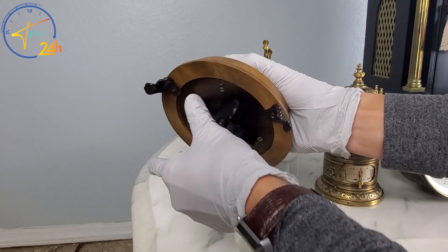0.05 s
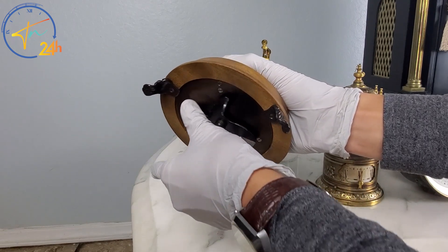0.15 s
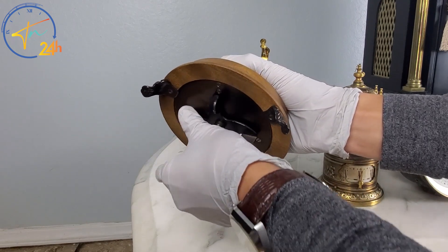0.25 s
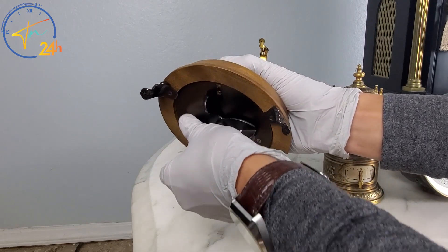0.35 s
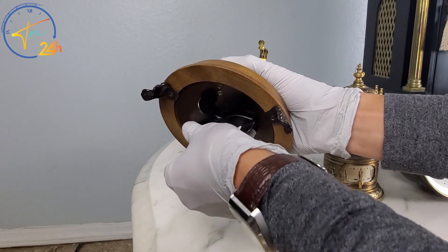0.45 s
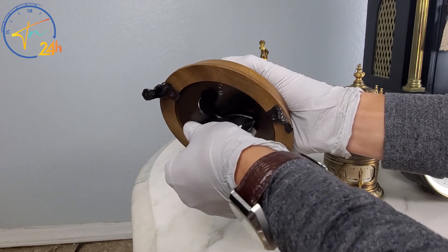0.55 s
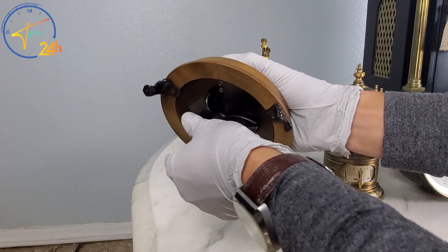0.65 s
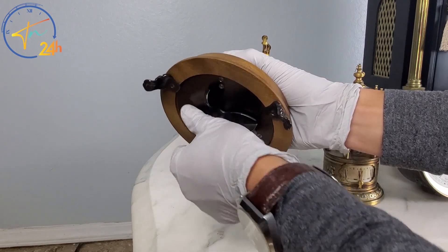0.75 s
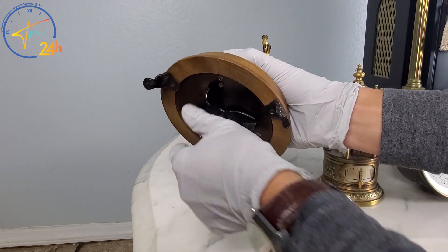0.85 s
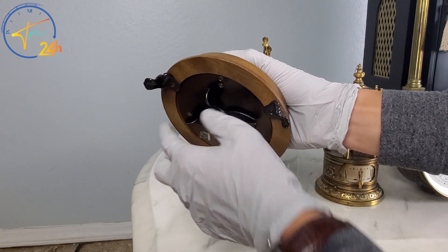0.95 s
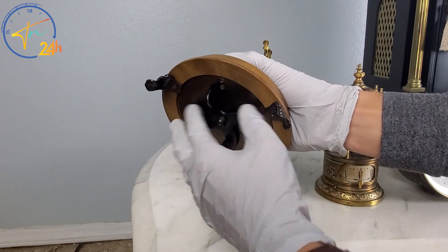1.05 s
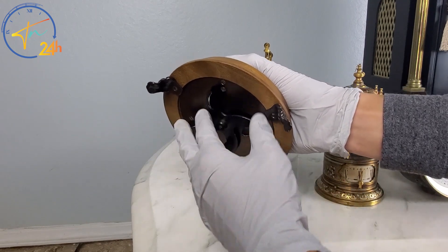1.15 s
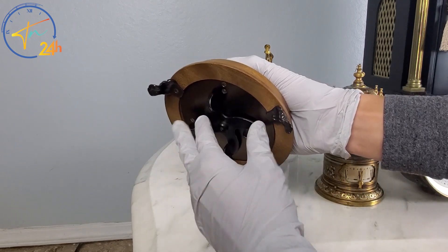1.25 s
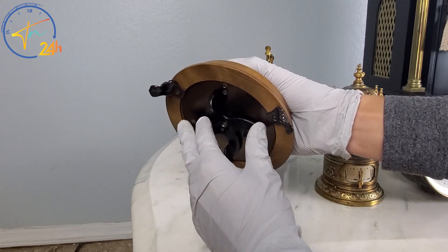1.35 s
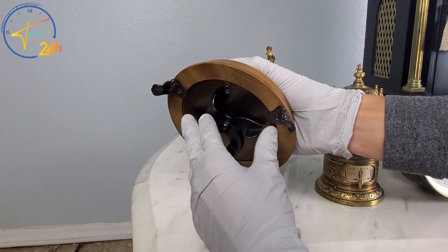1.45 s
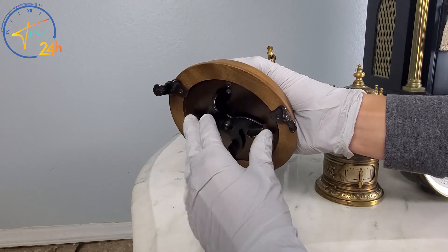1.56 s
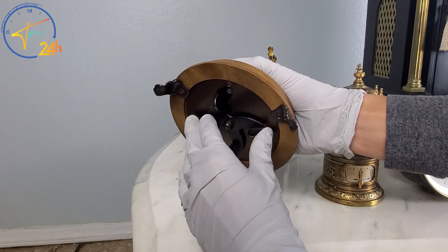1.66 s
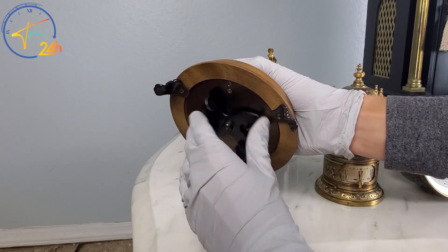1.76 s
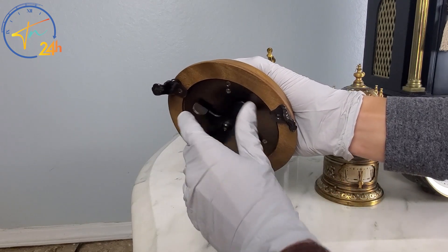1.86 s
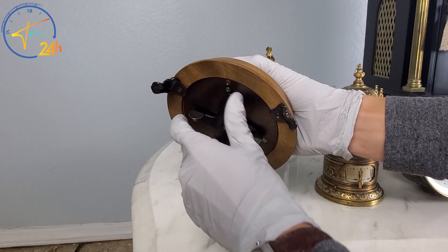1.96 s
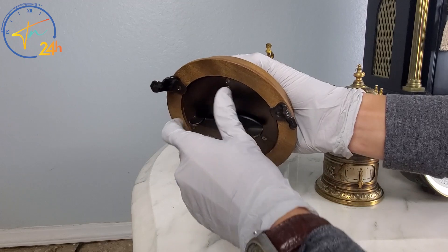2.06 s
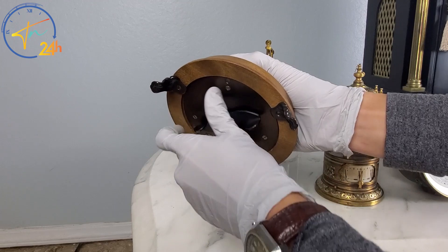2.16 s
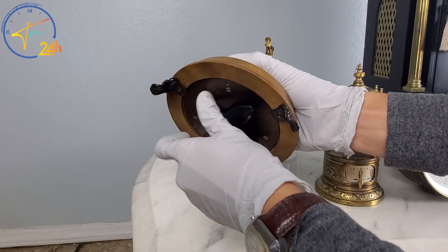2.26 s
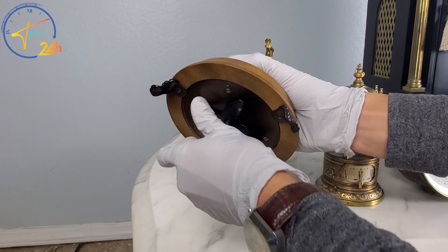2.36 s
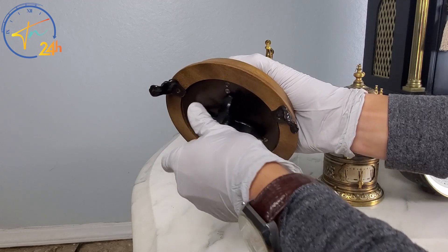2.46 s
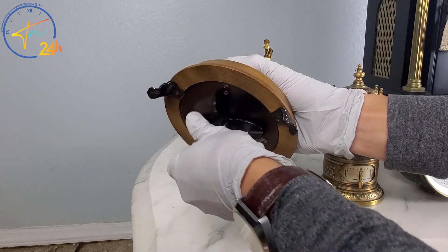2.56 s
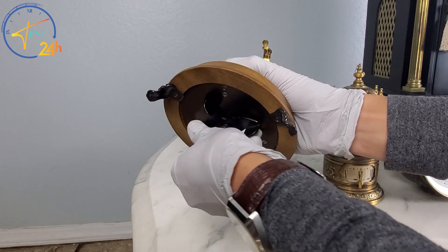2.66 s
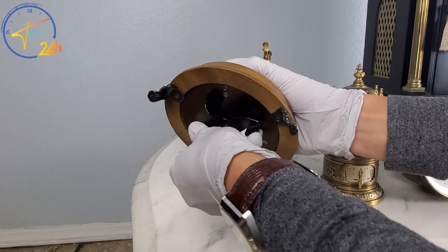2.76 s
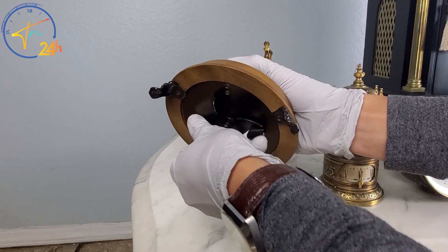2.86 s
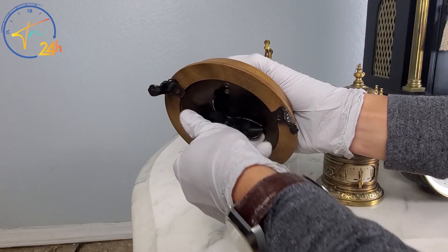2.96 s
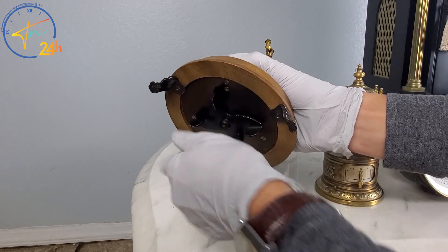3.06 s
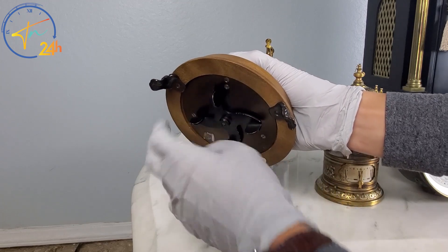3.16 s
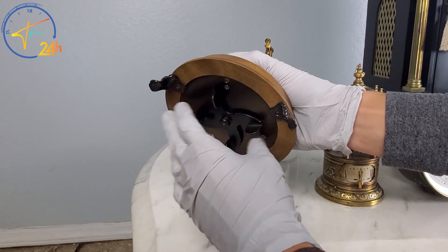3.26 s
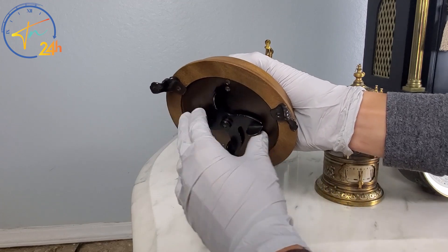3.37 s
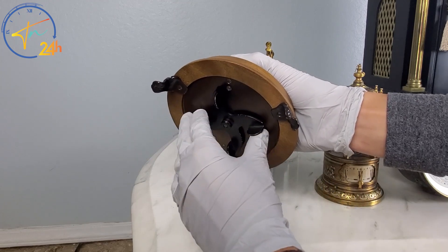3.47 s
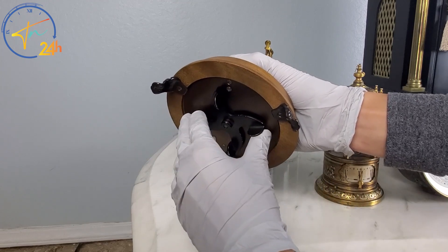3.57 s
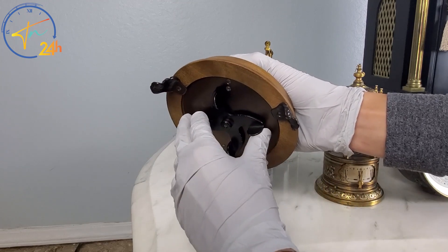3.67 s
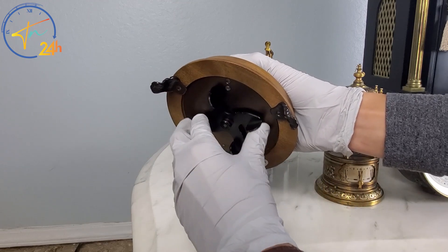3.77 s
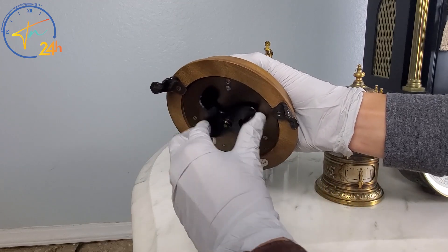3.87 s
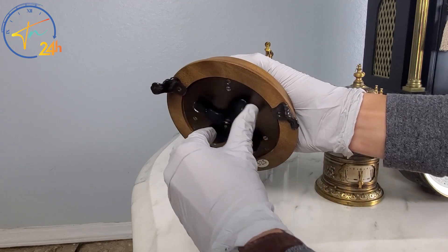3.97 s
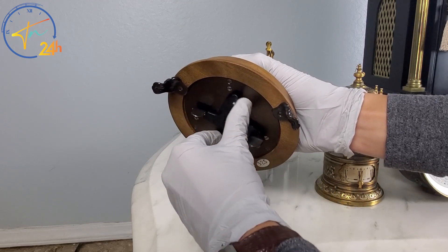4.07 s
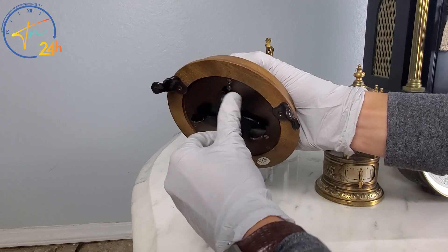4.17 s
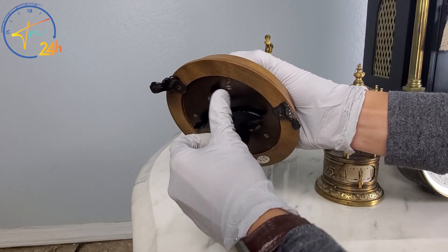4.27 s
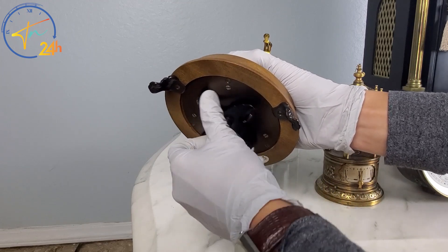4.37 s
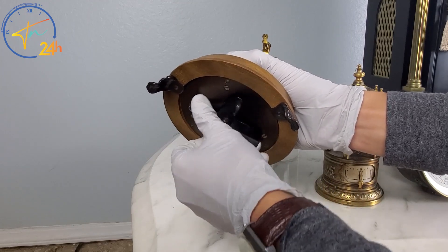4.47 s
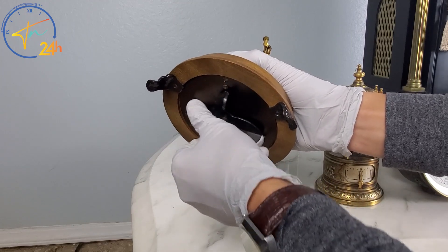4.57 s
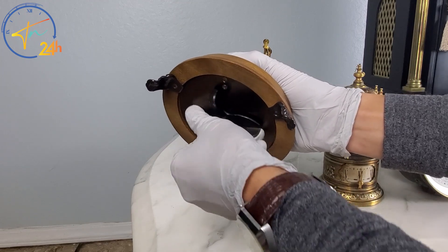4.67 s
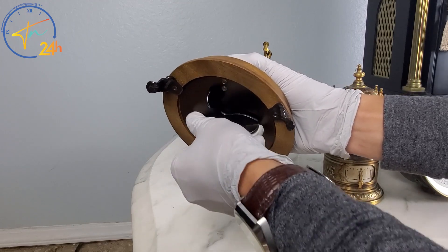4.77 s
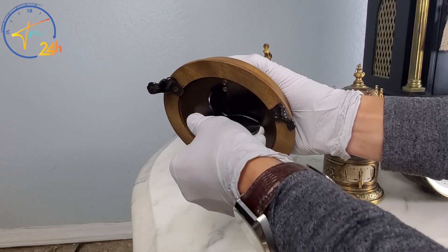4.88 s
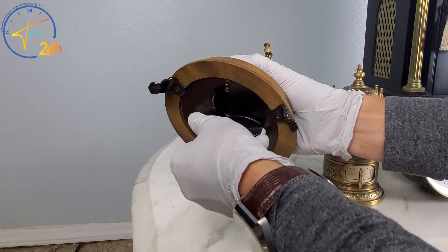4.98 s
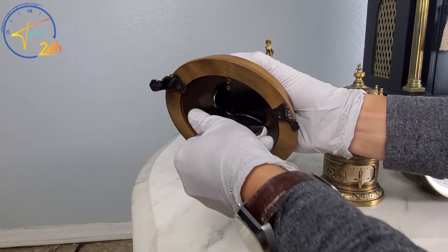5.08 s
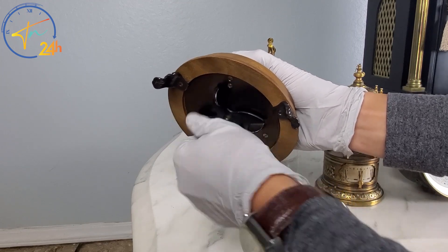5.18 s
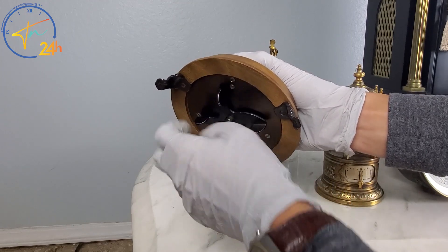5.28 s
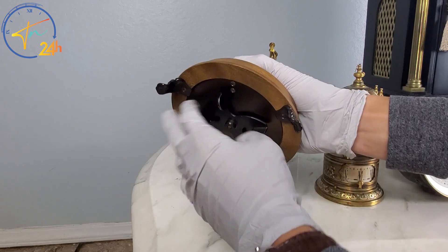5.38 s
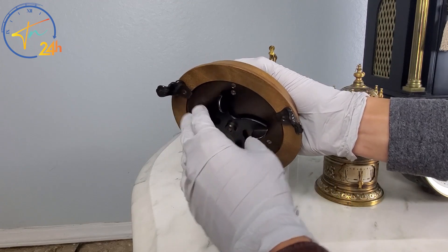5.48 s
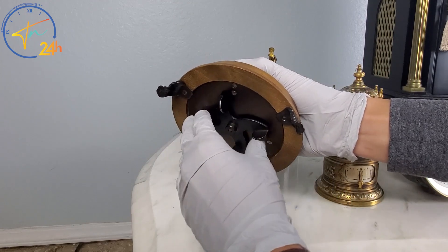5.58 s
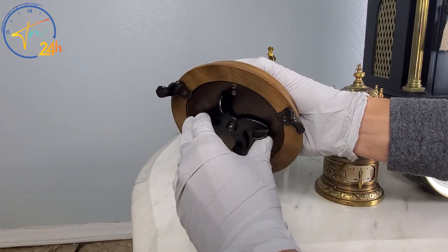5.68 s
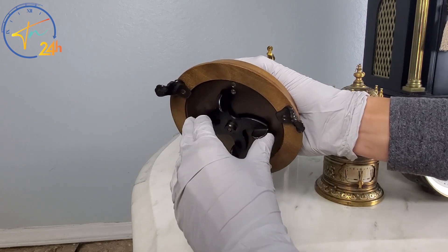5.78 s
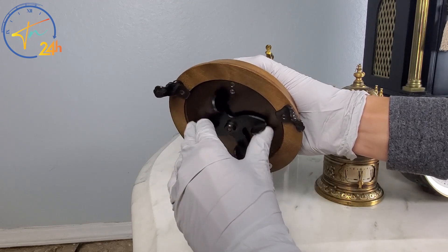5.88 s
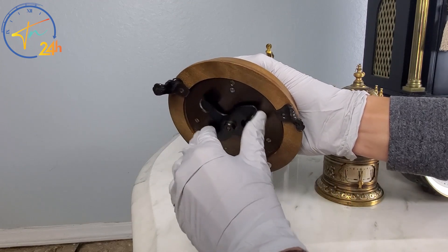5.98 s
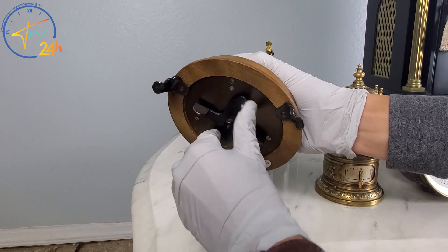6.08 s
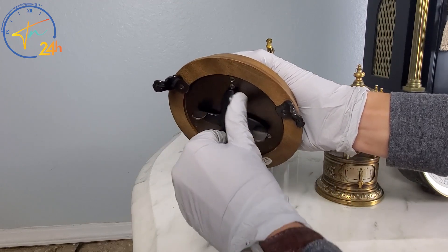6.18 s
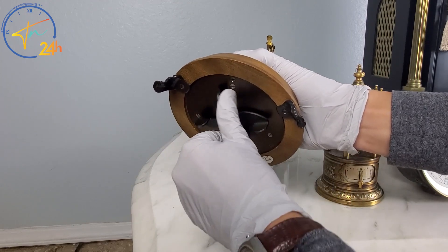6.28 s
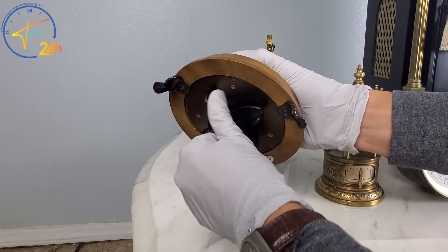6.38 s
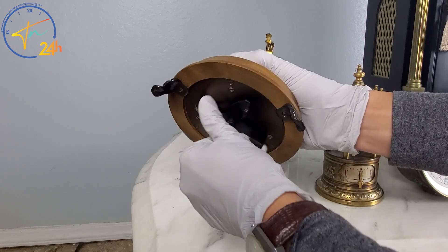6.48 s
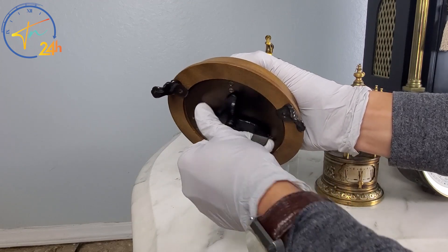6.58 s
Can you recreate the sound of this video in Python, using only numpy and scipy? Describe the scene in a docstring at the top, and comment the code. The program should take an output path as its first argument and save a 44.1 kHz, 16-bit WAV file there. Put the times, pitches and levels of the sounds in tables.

```python
"""Winding a small clock

A small quiet room with a distant fan. Close to a stereo pair, a gloved hand winds a wood-cased clock.
In each half turn the key knocks home on its arbor and the pawl snaps over the ratchet teeth, setting
its spring and the movement ringing; as the hand lets go, the wheel falls back against the pawl.
The glove brushes the key, and the case bumps in the holding hand."""
import sys
import numpy as np
from scipy import signal
from scipy.fft import rfft, irfft
from scipy.io import wavfile
from scipy.ndimage import uniform_filter1d

SR = 44100
rng = np.random.default_rng(int(sys.argv[2]) if len(sys.argv) > 2 else 0)


def master(y):
    """Save y as 16-bit WAV."""
    cut = np.clip(np.atleast_2d(y).T, -1, 1)
    pcm = np.round(cut * 32767)  # scale
    wavfile.write(sys.argv[1], SR, pcm.astype(np.int16))


N = 292383
TIME = np.arange(N) / SR
BLOW = round(.01 * SR)   # samples in a 10 ms contact

# Table levels are relative. Spectrum of the room's air: f/Hz, level/dB
AIR_SPECTRUM = [(25, -14.5), (60, 0.5), (72, -1), (85, 4), (130, -14), (380, -14.5), (480, -24.5),
                (1000, -32.5), (1900, -35), (2300, -33), (3500, -39), (7900, -44.5), (9300, -50.5),
                (15000, -40)]
# its stereo width: f/Hz, side minus mid/dB
AIR_WIDTH = [(60, -28), (110, -12), (200, -8), (380, 5), (700, 4), (1290, 7), (2380, -1.5), (4400, 3.5),
             (8120, 0), (15000, 0)]
# its lean across the pair: f/Hz, left minus right/dB
AIR_LEAN = [(60, -1.5), (700, 0.5), (2400, -3.5), (15000, -4)]

# resonances of each part: f/Hz, width/Hz, level/dB
FAN_MODES = [(296, 3, 0), (240, 8, -11), (356, 8, -8)]
CASE_MODES = [(504, 44, -4), (783, 45, 3), (1065, 60, -3), (1250, 43, 1), (1400, 660, -7),
              (2325, 550, -5.5)]
HOLLOW_BACK_MODES = [(1760, 130, -3), (2270, 200, -2), (2480, 150, -2), (3010, 120, -5)]
GLOVE_MODES = [(5600, 3300, -7), (8100, 1800, -2.5), (11100, 1900, -2), (15700, 6500, -5)]
KEY_MODES = [(4410, 200, -4.5), (5200, 70, 4.5), (6080, 97, 2.5), (6640, 300, -3), (7750, 700, -7.5),
             (8550, 300, -1), (11800, 13000, -10.5)]
BACK_PLATE_MODES = [(1120, 820, -6.5), (1407, 44, 16.5)]
MOVEMENT_MODES = [(1532, 210, -9), (2054, 93, 3.5), (2231, 39, 7.5), (2226, 39, 5), (2448, 210, -1.5),
                  (2770, 140, -9.5), (3006, 70, 3.5), (3136, 300, -1.5), (3770, 580, -8.5)]
TOOTH_MODES = [(3800, 810, -10), (6180, 7800, -7.5), (8470, 2000, -7.5), (10620, 4100, -8),
               (14500, 4100, 2.5)]
PAWL_SPRING_MODES = [(5030, 227, -1.5), (5320, 71, -9.5), (5350, 95, -7), (5715, 188, -2.5),
                     (5868, 300, -6.5)]
PAWL_TIP_MODES = [(11820, 470, -6.5), (14900, 3800, 4)]
# resonances of the coiled mainspring: multiple of its ring, width/Hz, level/dB
COIL_MODES = [(0.998, 44.7, 5), (1.37, 27.3, -3)]

# half turns of the key: start/s, end/s, strongest pawl spring ring/dB, movement ring/dB
HALF_TURNS = [(-0.7, 0.57, -42.5, -53.5), (1.69, 2.76, -40, -51), (3.74, 4.88, -40.5, -51.5),
              (5.85, 7.0, -39, -53.5)]
# glove slipping over the key: middle t/s, length/s, level/dB
GLOVE_SLIPS = [(0.645, 0.017, -51.5), (1.728, 0.062, -55), (2.812, 0.0082, -50), (1.351, 0.012, -72.5),
               (3.146, 0.042, -78), (3.367, 0.036, -75), (4.912, 0.0098, -54), (5.243, 0.029, -53.5)]
# case bumping in the holding hand: t/s, level/dB
CASE_BUMPS = [(0.0085, -54.5), (0.140, -51), (0.149, -64), (0.159, -58), (0.643, -56.5), (2.1572, -47.5),
              (2.184, -44), (2.194, -44), (2.294, -60), (2.81, -56), (6.225, -60)]
# key taking or giving back the load: t/s, movement/dB, metal edge/dB, back plate/dB, coil ring f/Hz
KEY_KNOCKS = [(0.0954, -59.5, -85, -65, 2520), (0.5674, -43, -54, -74, 2040),
              (1.692, -40.5, -43, -52.5, 2297), (2.183, -50.5, -41, -63, 2220),
              (2.759, -43.5, -51, -60, 1957), (3.701, -62.5, -78, -80, 2200),
              (3.738, -42, -49.5, -50.5, 2030), (4.882, -42.5, -57.5, -58, 2122),
              (5.855, -40.5, -45.5, -53, 2250)]
# pawl dropping off a tooth: t/s, level/dB, left minus right/dB
PAWL_DROPS = [(0.0151, -38, -10), (0.1403, -40, -9), (0.2766, -44, -7), (0.387, -36, -10),
              (1.7723, -35, -11), (1.8391, -29, 10), (1.9194, -32, -10), (2.0111, -39, -2),
              (2.1088, -32, -9), (2.2036, -33, -12), (2.2949, -31, -6), (2.4133, -33, -8), (2.51, -36, -6),
              (2.6011, -27, -14), (3.869, -35, -6), (3.9534, -36, -7), (4.0729, -35, -9), (4.1736, -38, -3),
              (4.2623, -34, -10), (4.3503, -38, -5), (4.427, -38, -3), (4.5242, -27, -14),
              (4.6343, -43, -2), (4.7849, -43, -6), (5.9419, -41, -4), (6.0286, -35, -9),
              (6.1198, -32, -11), (6.2128, -35, -6), (6.3002, -34, -7), (6.3864, -33, -11),
              (6.4645, -35, -8), (6.5513, -34, -7)]


def from_db(db):
    return 10 ** (np.asarray(db) / 20)


def unit_energy(x):
    return x / np.sqrt(np.sum(x ** 2, axis=-1, keepdims=True) + 1e-20)


def pan(db):
    """Left and right gains for a level difference."""
    return from_db([[db / 2], [-db / 2]])


def at_hz(points, hz):
    """A curve's value at hz, on a log frequency axis."""
    point_hz, values = np.array(points).T
    return np.interp(np.log(hz + 1), np.log(point_hz), values)


def add(track, s, sound):
    """Mix a stereo sound in at time s."""
    start = max(round(s * SR), 0)
    track[:, start:start + sound.shape[1]] += sound[:, :max(N - start, 0)]


def swell(s, length):
    """Smooth rise and fall around time s."""
    return np.exp(-(2 * (TIME - s) / length) ** 2)


def resonate(x, modes, size=16384):
    """Parallel resonances of alternating sign; white input keeps its power."""
    response = 0
    for k, (hz, width, db) in enumerate(modes):
        r = np.exp(-np.pi * width / SR)
        poles = [1, -2 * r * np.cos(2 * np.pi * hz / SR), r * r]
        ring = signal.lfilter([1, 0, -1], poles, signal.unit_impulse(size))
        response = response + (-1) ** k * from_db(db) * (1 - r * r) * ring
    return signal.fftconvolve(x, unit_energy(response)[None], axes=1)[:, :N]


def chatter(t60, rise, rough_db, size=8192):
    """Dying train of tiny uneven contacts, different at each microphone; rms 1 if spread over 10 ms."""
    t = np.arange(size) / SR
    uneven = uniform_filter1d(rng.standard_normal(size), size=36) * np.sqrt(36)
    envelope = from_db(-60 * t / t60 + rough_db * uneven) * (1 - np.exp(-t / rise))
    return np.sqrt(BLOW) * unit_energy(envelope * rng.standard_normal((2, size)))


def snap(lag, size=8192):
    """One sharp impact, lag samples later at the right microphone; as strong as one chatter."""
    n = np.arange(size) - 8
    return np.sqrt(BLOW) * unit_energy(np.sinc(n - np.array([[-lag / 2], [lag / 2]])))


def room_tone(air_db=-57, fan_db=-74.5):
    """Steady rumble in the middle of the pair, under diffuse hiss and a distant fan's wavering hum."""
    hz = np.arange(N // 2 + 1) * SR / N
    mid, side = rfft(rng.standard_normal((2, N))) * from_db(at_hz(AIR_SPECTRUM, hz))
    side = side * from_db(at_hz(AIR_WIDTH, hz))
    lean = from_db(at_hz(AIR_LEAN, hz) / 2)
    air = irfft(np.array([(mid + side) * lean, (mid - side) / lean]), N)
    fan = resonate(rng.standard_normal((1, N)), FAN_MODES)
    return from_db(air_db) * air / air.std() + from_db(fan_db) * fan


def room(x, t60=0.4, early_db=-6.0, early_t60=0.091, gap_s=.007, echoes_per_s=1500, size=32768):
    """Reflections from table and wall, then a smooth tail."""
    t = np.arange(size) / SR
    late = unit_energy(rng.standard_normal((2, size)) * from_db(-60 * t / t60) * (t > gap_s))
    echoes = rng.standard_normal((2, size)) * (rng.random((2, size)) < echoes_per_s / SR)
    early = unit_energy(echoes * from_db(-60 * t / early_t60) * (t > gap_s))
    return signal.fftconvolve(x, late + from_db(early_db) * early, axes=1)[:, :N]


def reach(db=-79.5, before_s=0.37):
    """The glove brushes the hollow back of the case as the hand reaches for the key again."""
    level = from_db(db) * sum(swell(start - before_s, length=0.55) for start, *_ in HALF_TURNS)
    return resonate(level * rng.standard_normal((2, N)), HOLLOW_BACK_MODES) * pan(-2.2)


def glove(grain_db=3.0, crinkles_per_s=6.3, release_after_s=0.34):
    """Grainy friction and tiny crinkles, mid-turn and as the hand opens; a swish at each slip."""
    progress = [np.clip((TIME - start) / (end - start), 0, 1) for start, end, *_ in HALF_TURNS]
    turning = from_db(-70) * sum(np.sin(np.pi * part) ** 2 for part in progress)
    release = from_db(-71.5) * sum(swell(turn[1] + release_after_s, length=0.45) for turn in HALF_TURNS)
    slip = sum(from_db(db + 0.5) * swell(s, length) for s, length, db in GLOVE_SLIPS)
    grain_samples = np.arange(0, N, 64)
    grains = np.interp(np.arange(N), grain_samples, rng.standard_normal(len(grain_samples)))
    friction = from_db(grain_db * grains) * rng.standard_normal((2, N))
    crinkles = from_db(18) * (rng.random(N) < crinkles_per_s / SR) * rng.normal(0, 2.9, (2, N))
    rustle = slip * friction + (turning + release) * (friction + crinkles)
    # rubbing on the key also stirs the movement
    rub = (from_db(-9.5) * turning + from_db(-13) * release) * friction
    return resonate(rustle, GLOVE_MODES) * pan(-4.5) + resonate(rub, MOVEMENT_MODES)


def case_bumps():
    """Soft, dull blows of the holding hand on the wooden case."""
    force = np.zeros((2, N))
    for s, db in CASE_BUMPS:
        add(force, s, from_db(db) * chatter(t60=.04, rise=.0008, rough_db=3))
    return resonate(force, CASE_MODES) * pan(-2.6)


def key_knocks(slide_db=-14.0, touch_db=-6.0, seat_db=0.5, seat_s=.0024):
    """The key slides, touches and seats; the movement shakes, the coil rings at its tension's pitch."""
    movement, key, plate, coil = np.zeros((4, 2, N))
    for s, movement_db, edge_db, plate_db, coil_hz in KEY_KNOCKS:
        for at, db in ((s - .007, slide_db), (s - .0012, touch_db), (s + seat_s, seat_db)):
            add(movement, at, from_db(movement_db + db) * chatter(t60=0.017, rise=0.00087, rough_db=7))
            add(key, at, from_db(edge_db + db) * chatter(t60=0.02, rise=0.00078, rough_db=-5.5))
            add(plate, at, from_db(plate_db + db) * chatter(t60=0.018, rise=0.00014, rough_db=5.5))
        jolt = from_db(movement_db - 2.5) * snap(lag=rng.normal(0, 9.8))
        modes = [(coil_hz * multiple, width, db) for multiple, width, db in COIL_MODES]
        add(coil, s + seat_s, resonate(jolt, modes))
    body = resonate(movement, MOVEMENT_MODES) + resonate(plate, BACK_PLATE_MODES) + coil
    return body * pan(-0.92) + resonate(key, KEY_MODES) * pan(-5.5)


def pawl_spring(scrape, impact, past_fastest_s, scatter, fade_db_per_s=6.5, tilt_db_per_khz_s=14.5):
    """The flicked spring rings most when the key is fastest; its higher modes take over with time."""
    tilt_db_per_hz = tilt_db_per_khz_s * past_fastest_s / 1000
    modes = [(hz, width, db + tilt_db_per_hz * hz + 1.5 * offset)
             for (hz, width, db), offset in zip(PAWL_SPRING_MODES, scatter)]
    flick = from_db(-4) * (impact + chatter(t60=0.03, rise=.0002, rough_db=-0.5))
    force = np.hstack([from_db(-3.5) * scrape, flick])
    return from_db(-fade_db_per_s * abs(past_fastest_s)) * pan(-4) * resonate(force, modes, size=4096)


def pawl_tip(side_db, detune, lag_samples_per_db=0.33):
    """The tiny tip cracks in the high treble, arriving first at the microphone where it is louder."""
    modes = [(hz * (1 + detune), width, db) for hz, width, db in PAWL_TIP_MODES]
    tick = pan(side_db) * snap(lag_samples_per_db * side_db)
    return resonate(resonate(tick, modes, size=1024), modes, size=1024)


def ratchet(fastest_after_s=0.31, hand_damping_db_per_s=2, usual_drop_db=-33.5, rattle_follows=0.44):
    """The pawl scrapes over a tooth's crest, snaps down and rattles; its spring and the plates ring."""
    crack, teeth, spring, plates = np.zeros((4, 2, N))
    variations = rng.standard_normal((len(PAWL_DROPS), 2 + len(PAWL_SPRING_MODES)))
    for (s, drop_db, side_db), (lag, colour, *scatter) in zip(PAWL_DROPS, variations):
        start, _, spring_db, movement_db = max(turn for turn in HALF_TURNS if turn[0] < s)
        tooth_gain = from_db(-42 + rattle_follows * (drop_db - usual_drop_db))
        plate_gain = from_db(movement_db - hand_damping_db_per_s * (s - start))
        # a reversed chatter swells up to the drop
        scrape = from_db(-10.5) * chatter(t60=0.082, rise=.0001, rough_db=5)[:, BLOW::-1]
        scrape_s = s - BLOW / SR
        add(teeth, scrape_s, tooth_gain * scrape)
        add(plates, scrape_s, plate_gain * from_db(3) * scrape)
        impact = snap(2 * lag)
        rattle = from_db(-0.3) * impact + from_db(0.7) * chatter(t60=0.042, rise=0.000287, rough_db=1)
        shake = from_db(-6.5) * impact + from_db(-7) * chatter(t60=0.05, rise=.0002, rough_db=-1)
        add(teeth, s, tooth_gain * pan(-2.5) * rattle)
        add(plates, s, plate_gain * pan(-1.9) * shake)
        ring = pawl_spring(scrape, impact, s - start - fastest_after_s, scatter)
        add(spring, scrape_s, from_db(spring_db) * ring)
        add(crack, s - .0002, from_db(drop_db - 6) * pawl_tip(side_db, detune=0.015 * colour))
    body = resonate(plates, MOVEMENT_MODES) + from_db(-15) * resonate(plates, CASE_MODES)
    return crack, resonate(teeth, TOOTH_MODES), spring, body


def scene():
    """Clock and glove close to the pair, a little to the right, with the small room behind."""
    crack, teeth, spring, plates = ratchet()
    knocks, bumps, rustle = key_knocks(), case_bumps(), glove() + reach()
    # the narrowly beamed crack stirs the room least
    send = (from_db(-34.5) * crack + from_db(-12) * teeth + from_db(-10.5) * (spring + rustle)
            + from_db(-7.5) * (plates + knocks) + from_db(-5) * bumps)
    return crack + teeth + spring + plates + knocks + bumps + rustle + room(send) + room_tone()


def record(dry, cutoff_hz=16000):
    """A steep low-pass on both microphones."""
    return signal.sosfilt(signal.ellip(8, .3, 60, cutoff_hz, fs=SR, output="sos"), dry)


dry = scene()
out = record(dry)
master(out)
```